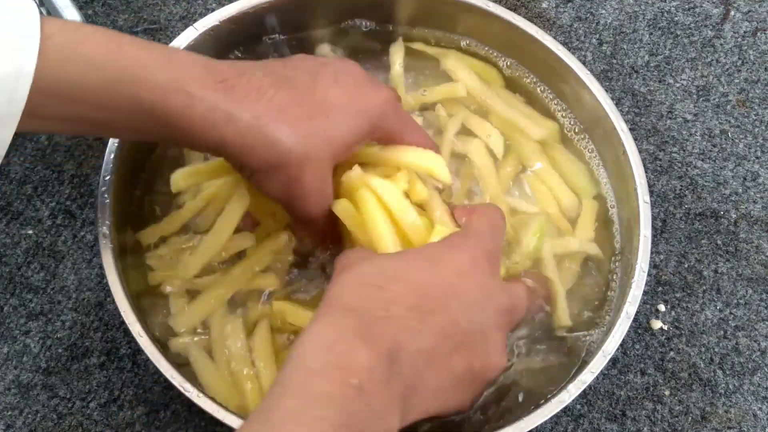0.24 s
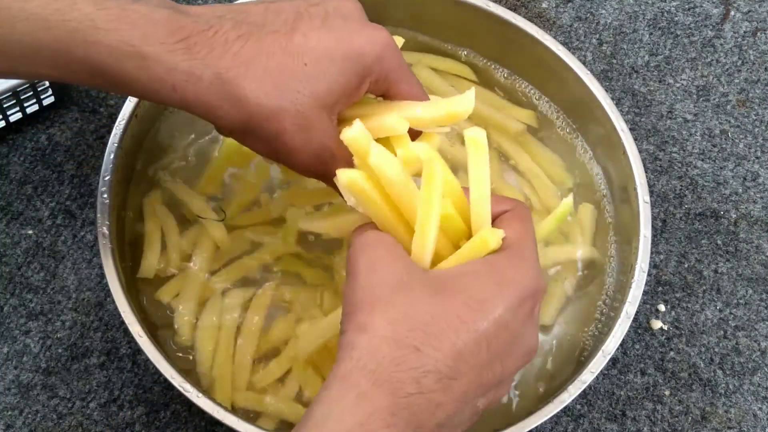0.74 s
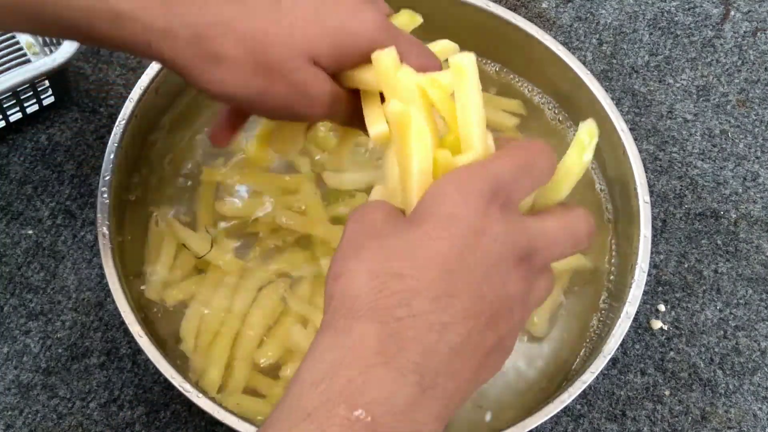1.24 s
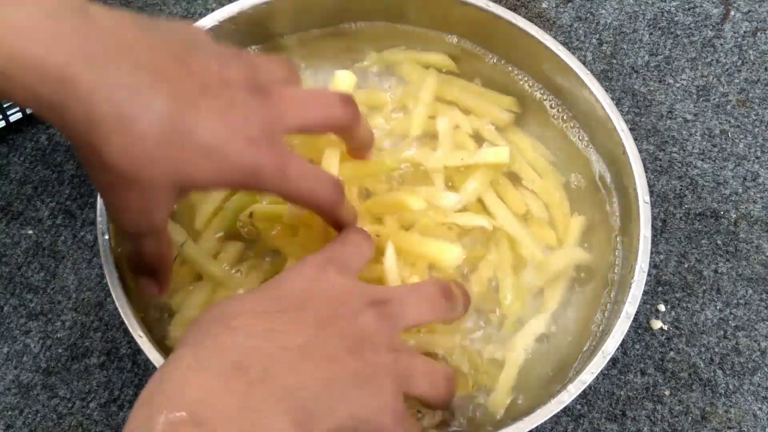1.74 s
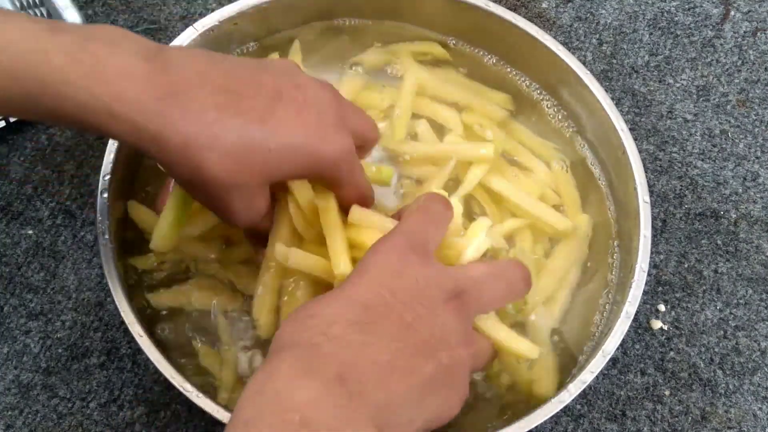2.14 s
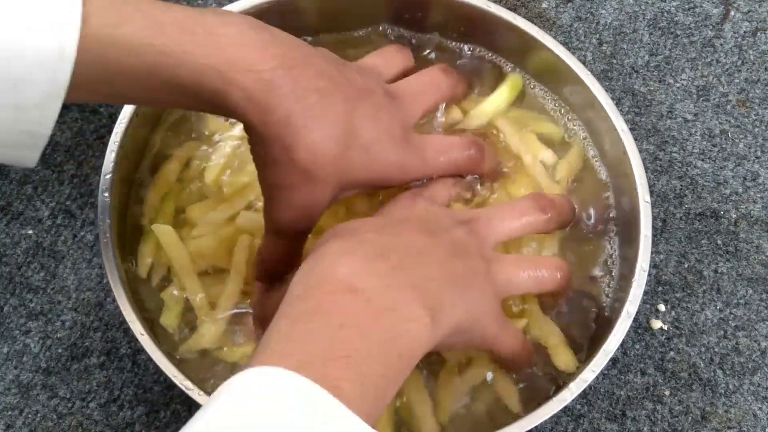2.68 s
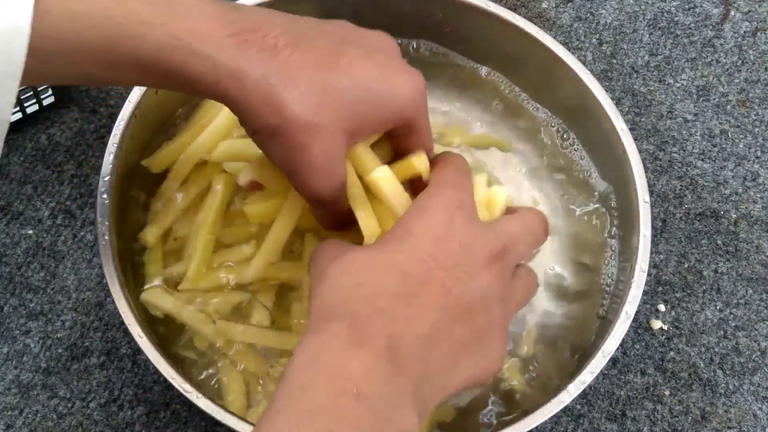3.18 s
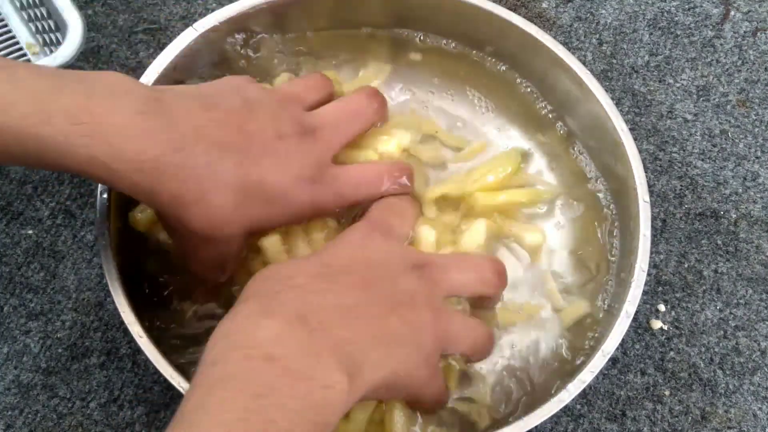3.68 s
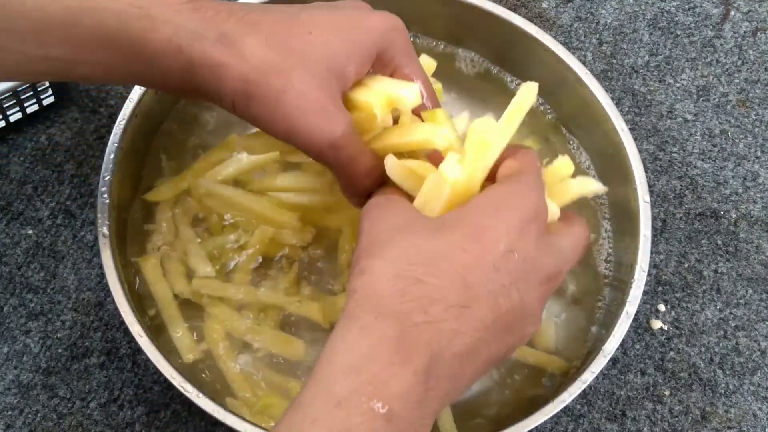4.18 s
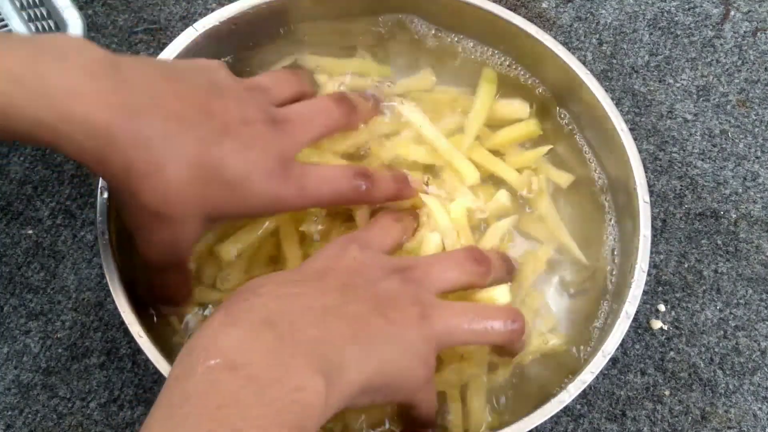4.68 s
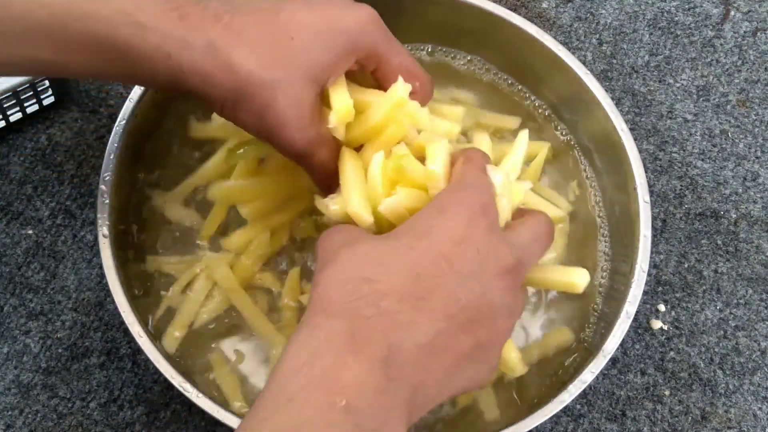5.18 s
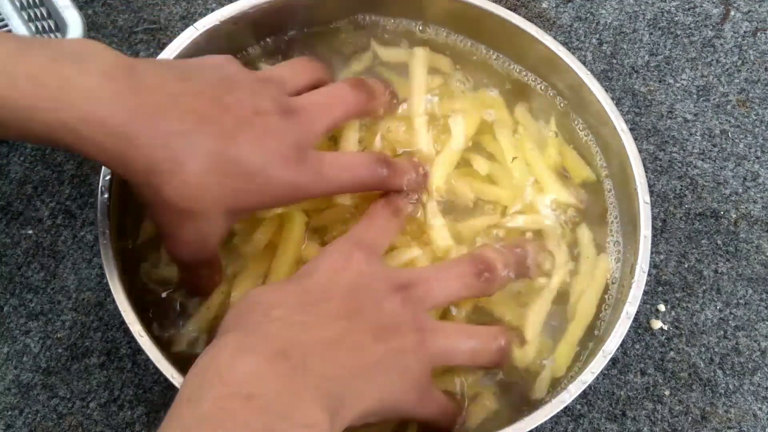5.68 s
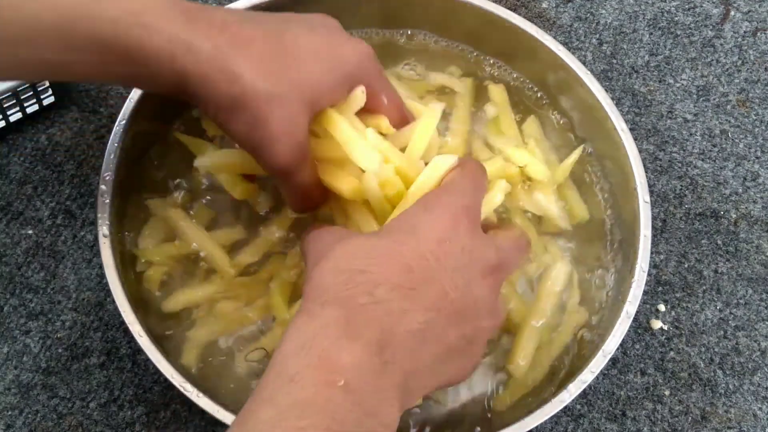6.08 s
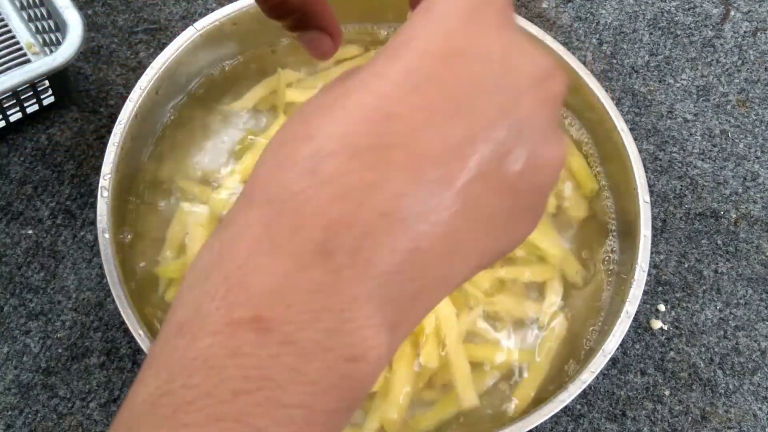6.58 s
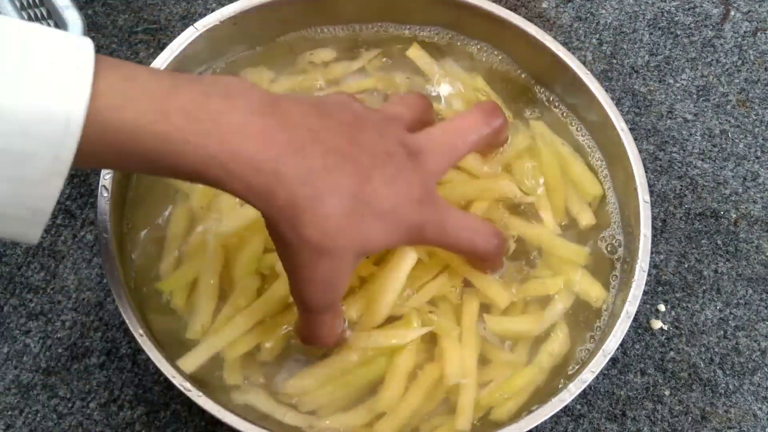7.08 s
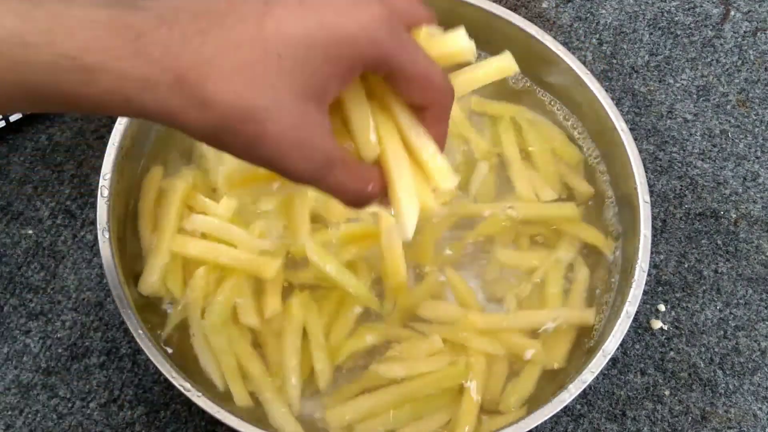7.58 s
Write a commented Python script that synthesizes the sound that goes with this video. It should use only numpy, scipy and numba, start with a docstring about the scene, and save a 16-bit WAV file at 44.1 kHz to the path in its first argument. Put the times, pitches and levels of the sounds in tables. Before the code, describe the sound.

A low, slightly wavering engine drone and soft rumble run beneath close water handling. Wet potato sticks are scooped and released in a bowl: trickling spray at first, then short splashes and small gurgles between quieter gaps where the hiss turns thin and flickering. Fuller splashing returns near the end, with high ticking drops and small plops. The microphone is near the water, with no obvious echo.

```python
"""At a steel bowl of water near an idling engine: two hands scoop and drop potato sticks, heard close up.
Drops tick, larger bubbles plop; both are damped sines that rise in pitch. Dense swarms of such bubbles
make spray, trickle, gurgle and slop. The engine is four multiples of its firing rate over a noise rumble.
Air hiss and narrow noise streaks lie underneath; when the spray is faint, water, rumble and air thin
into flickering narrow bands."""
import sys
import numpy as np
from scipy import signal
from scipy.fft import rfft, irfft
from scipy.io import wavfile
from scipy.ndimage import uniform_filter1d
from numba import njit

SR = 44100
rng = np.random.default_rng(int(sys.argv[2]) if len(sys.argv) > 2 else 0)


def int16_out(signal):
    """Quantize to a 16-bit WAV file."""
    q = np.round(np.clip(np.atleast_2d(signal).T, -1, 1) * 32767)
    wavfile.write(sys.argv[1], SR, q.astype(np.int16))


N = 345303

# engine: (time [s], mean firing rate [Hz], multiple 4 [dB], loudest of multiples 5-7 [-], its level [dB]);
# levels before trim and wavering
ENGINE_CURVE = [(0.0, 23.7, -55, 5.8, -28), (0.3, 24.0, -45, 5.9, -29.5), (1.13, 25.5, -60, 5.1, -28),
                (1.28, 24.63, -31, 7, -46), (1.46, 26.2, -32, 5, -50), (1.74, 25.6, -34, 6, -28.5),
                (2.14, 25.3, -40, 5, -29.5), (2.66, 25.5, -59, 5.1, -32), (2.8, 25.5, -37, 6, -37.5),
                (3.12, 25.9, -32.5, 5, -30), (3.45, 25.4, -31.5, 5.5, -28.5),
                (3.68, 24.61, -39.5, 6, -36.5), (4.0, 25.1, -33.5, 5, -33), (4.56, 25.5, -34, 5, -29),
                (4.7, 26.2, -33, 5, -31.5), (4.88, 23.6, -57, 6, -27), (5.6, 23.7, -33.5, 5.9, -24.5),
                (6.19, 24.05, -34.5, 5.6, -25), (6.32, 24.1, -33.5, 6, -30), (6.87, 24.1, -38, 6, -40),
                (7.3, 24.3, -30, 5.6, -29), (7.63, 24.4, -28.5, 5.2, -28.5), (7.83, 24.7, -49, 5, -30.5)]
# rumble spectrum: (frequency [Hz], relative density [dB per Hz])
RUMBLE_SPECTRUM = [(12, -13), (20, -21), (48, -15), (102, -1), (128, 1), (160, 0.5), (222, -13),
                   (279, -15.5), (420, -26.5), (550, -63), (920, -120)]
# air hiss spectrum: (frequency [Hz], relative density [dB per Hz])
AIR_SPECTRUM = [(300, -12), (500, -1), (900, -4), (1500, -15.5), (3000, -17.5), (9000, -33), (15500, -18)]
# lingering narrow bands of hiss: (start [s], end [s], centre [Hz], width [Hz], level before fades [dB])
STREAK_BANDS = [(0, 1.36, 347, 40, -52.5), (0, 2.3, 256.5, 41, -47), (5, 8.1, 265.7, 47, -47),
                (3, 3.22, 480, 70, -53), (2.29, 2.43, 2390, 88, -56), (3, 3.9, 262, 60, -46),
                (3.91, 4.29, 3050, 70, -54), (3.8, 4.25, 3400, 50, -57), (3.84, 4.27, 2720, 50, -59),
                (3.43, 3.8, 2900, 130, -58), (6.89, 7.08, 850, 45, -42), (5.0, 5.2, 1900, 90, -53),
                (1.26, 1.44, 2620, 110, -48), (2.71, 2.9, 2300, 120, -60), (2.73, 2.8, 4950, 250, -55),
                (0.62, 0.85, 2620, 110, -50), (0.94, 1.08, 2620, 110, -50), (6.92, 7.17, 1870, 130, -46),
                (4, 4.94, 346, 37, -47), (5, 5.22, 870, 47, -50.5), (5.5, 5.8, 866, 47, -56),
                (5, 6.34, 365, 29, -49), (6.5, 6.74, 1900, 120, -49.5), (4.8, 4.92, 3300, 200, -60),
                (4.89, 5.07, 4700, 200, -56), (5.2, 5.62, 1300, 90, -59), (1.63, 1.81, 2400, 100, -55),
                (1.7, 1.84, 1700, 90, -58), (1.87, 2.03, 2750, 100, -58), (2.03, 2.32, 870, 60, -55),
                (4.52, 4.74, 2850, 70, -60), (7, 7.9, 870, 58, -53.5)]
# water draining from hands and sticks: (time [s], spray level before mix [dB])
DRAIN_CURVE = [(0.0, -32), (0.2, -31.5), (0.42, -33.5), (0.64, -35.5), (0.9, -30.5), (1.08, -30.5),
               (1.42, -33), (1.54, -47), (2.1, -61), (2.5, -56.5), (3.15, -81), (3.9, -51.5), (4.6, -53.5),
               (5.0, -54.5), (5.4, -50), (5.68, -55), (6.0, -80), (6.14, -65), (6.24, -43), (6.45, -30),
               (6.66, -38), (6.75, -37.5), (7.2, -34), (7.5, -30), (7.83, -35.5)]
# splashes: (crest [s], rise [s], hold [s], spray [dB], trickle [dB], gurgle [dB], slop [dB]); before mix
SPLASH_EVENTS = [(0.1, 0.31, 0.1, -34.5, -47, -66, -46), (0.31, 0.12, 0.097, -38, -39.5, -53.5, -52),
                 (0.865, 0.34, 0.094, -34, -41.5, -57, -72), (1.188, 0.05, 0.022, -53, -48, -54, -45.5),
                 (1.448, 0.016, 0.015, -35, -50, -56, -69), (1.714, .05, 0.026, -40.5, -75, -77, -77),
                 (1.818, .02, 0.042, -48, -84, -82, -80), (2.221, 0.042, 0.05, -42, -45, -55, -72),
                 (2.302, .03, 0.014, -57, -68, -75, -49), (2.574, 0.021, 0.017, -50.5, -66, -67, -61),
                 (2.664, 0.059, 0.031, -40, -61, -57, -74), (2.86, 0.03, 0.17, -58, -61, -62, -45),
                 (3.05, 0.22, 0.085, -60, -57, -63, -44.5), (3.242, 0.13, 0.12, -41.5, -46.5, -45.5, -41.5),
                 (3.446, 0.06, 0.052, -51, -60, -55, -67), (3.617, 0.14, 0.045, -44, -49.5, -46, -46.5),
                 (3.767, 0.087, 0.06, -66, -74, -75, -40.5), (4.05, 0.013, 0.038, -38, -78, -54, -67),
                 (4.16, 0.033, .03, -48, -65, -73, -47), (4.342, 0.083, 0.03, -33.5, -38.5, -46, -49),
                 (4.625, .02, 0.014, -51, -64, -76, -45), (5.161, 0.094, 0.047, -42, -44.5, -50.5, -52.5),
                 (5.3, 0.077, 0.043, -48.5, -51, -55, -67), (5.444, .05, 0.028, -48, -54, -64, -71),
                 (5.732, .03, 0.0058, -37.5, -53, -76, -66), (5.797, 0.071, 0.031, -70, -39.5, -75, -68),
                 (6.2, 0.17, 0.05, -34.5, -40, -59, -44), (6.326, 0.053, 0.028, -30, -38, -45.5, -45),
                 (6.477, 0.051, 0.1, -56, -52, -48.5, -45), (6.703, 0.053, 0.045, -32, -43.5, -50.5, -49),
                 (6.813, 0.072, 0.038, -31, -66, -61, -47), (6.951, 0.034, 0.16, -34.5, -44.5, -53, -46.5),
                 (7.467, 0.59, 0.21, -56, -56, -44.5, -47.5), (7.608, 0.032, 0.036, -28, -38, -49, -66),
                 (7.703, 0.017, 0.009, -27.5, -31, -51, -53), (7.756, 0.025, 0.007, -25, -32, -35, -43)]
# decay after a splash: (spray, trickle, gurgle, slop) [dB/s]
SPLASH_FALL_DB_PER_S = [96, 133, 140, 108]
# wander of lapping: (trickle, gurgle, slop) [dB]
LAP_WANDER_DB = [2, 3, 2]
# spray weighting: (frequency [Hz], weight [dB])
SPRAY_WEIGHT = [(2060, -38), (3500, -19.5), (4500, -11), (5830, -4.5), (8680, 2.5), (12700, -5.5),
                (14900, -8), (15800, 11)]
# tiny drops carry no low sound: (frequency [Hz], weight [dB])
NO_BASS_WEIGHT = [(2000, -30), (4000, 0)]
# drops that hit the surface: (time [s], nominal peak [dB], starting pitch [Hz])
TICK_EVENTS = [(0.092, -14.5, 8350), (0.397, -19, 7600), (1.0617, -16, 8700), (1.1646, -13.5, 8750),
               (1.2233, -16, 7550), (1.3002, -18, 7280), (1.45, -17, 7450), (1.48, -17.5, 9250),
               (1.523, -27, 5570), (1.7205, -22, 6540), (1.744, -25, 10300), (1.789, -22, 6350),
               (1.877, -32, 8800), (1.927, -35, 5640), (2.1957, -19.5, 7980), (2.2288, -22.5, 6560),
               (2.244, -23, 8000), (2.2825, -23, 6800), (2.6306, -23.5, 10700), (3.271, -29.5, 5800),
               (3.321, -15, 8530), (3.4377, -33, 5800), (3.5886, -31.5, 6860), (3.672, -26, 5800),
               (4.0506, -8.5, 7810), (4.101, -24, 6800), (4.182, -24, 6865), (4.2487, -23.5, 9150),
               (4.2774, -23.5, 5650), (4.306, -22, 9060), (4.324, -16, 8400), (4.3477, -17.5, 9000),
               (4.3903, -16.5, 6560), (4.408, -12, 9600), (5.129, -32, 7200), (5.143, -24.5, 6960),
               (5.1935, -19.5, 9100), (5.226, -23, 8900), (5.2828, -28, 6700), (5.3506, -34, 6840),
               (5.374, -31, 9100), (5.447, -27, 7200), (5.7155, -21, 8600), (5.733, -15, 7740),
               (6.2088, -16.5, 9200), (6.261, -15, 7900), (6.343, -14.5, 9800), (6.4122, -19, 8430),
               (6.464, -26, 8000), (6.4795, -16.5, 7430), (6.489, -18, 8000), (6.5116, -21, 7200),
               (6.5575, -14, 9100), (6.576, -21, 8550), (6.697, -23, 7400), (6.8136, -28, 8840),
               (7.5972, -17, 4440), (7.625, -20, 9000), (7.662, -21, 8000), (7.7052, -10.5, 6840),
               (7.7131, -9, 9150), (7.7199, -12.5, 4270), (7.742, -10, 3680), (7.7443, -10, 6600),
               (7.7476, -7, 9150), (7.7605, -9, 7250), (7.7628, -10, 9000), (7.7655, -9, 7200),
               (7.769, -14, 8700), (7.806, -17, 7300)]
# larger bubbles: (time [s], nominal peak [dB], starting pitch [Hz])
PLOP_EVENTS = [(0.333, -34, 3500), (1.362, -35.5, 1980), (1.428, -45, 1580), (1.453, -34, 3090),
               (1.711, -42, 2430), (1.877, -39, 2850), (2.228, -42, 1825), (2.234, -37, 3100),
               (2.254, -37.5, 1405), (2.266, -38, 2500), (2.308, -39.5, 1005), (2.662, -39, 940),
               (3.153, -44, 1490), (3.621, -40, 1525), (4.073, -36, 1370), (4.248, -38, 2560),
               (4.334, -33, 3100), (4.369, -26.5, 1905), (5.145, -34, 1960), (5.172, -26.5, 2030),
               (5.19, -33, 3920), (5.809, -33, 2210), (6.22, -34, 2790), (6.314, -35.5, 1490),
               (6.697, -37, 2060), (6.933, -29.5, 841), (7.597, -26.5, 2090), (7.704, -30.5, 2680),
               (7.762, -24, 2720), (7.768, -33, 1270)]

RUMBLE_DB, AIR_DB = -32.5, -59.5
STEADY_AIR_UNDER_DB = -8  # air that never breaks up
SEVENTH_FLOOR_DB = -39  # multiple 7, before trim and wavering
OFF_PEAK_DB = -8  # per multiple away from the loudest
TRICKLE_UNDER_DB, GURGLE_UNDER_DB = -8.5, -46  # draining, relative to spray
THIN_DB_PER_DB, FULL_DB = 0.4, -29  # extra trickle loss per dB of spray below full flow
CALM_GURGLE_DB, CALM_SLOP_DB, LAP_HZ = -69.5, -57, 12  # lapping between splashes
SPLASH_RISE_DB = 22  # climb over one rise time
TICK_T60_CYCLES = 39  # main bubble, at starting pitch
PLOP_T60_S, PLOP_T60_POWER = 0.046, -.7  # at 2 kHz; smaller bubbles die sooner
TOP_HZ = 15600
STFT = dict(nperseg=512, noverlap=384)


def undb(db):
    """dB to amplitude."""
    return 10 ** (np.asarray(db) / 20)


def level(x, db):
    """Scales to an rms in dB."""
    return x * undb(db) / np.sqrt(np.mean(x ** 2))


def noise():
    """White noise of full length."""
    return rng.standard_normal(N)


def columns(table):
    """Every column of a time curve, one value a sample."""
    time_s, *rest = np.transpose(table)
    return [np.interp(np.arange(N) / SR, time_s, c) for c in rest]


def colour(x, spectrum):
    """Weights a sound by (Hz, dB) points, linear in dB over log frequency."""
    hz, db = np.transpose(spectrum)
    f = np.maximum(np.arange(N // 2 + 1) * SR / N, 1)
    return irfft(rfft(x) * undb(np.interp(np.log(f), np.log(hz), db)), N)


def walk(rate_hz):
    """Random levels held 1 / rate_hz and slewed twice; spread near 1."""
    k = max(int(SR / rate_hz), 2)
    held = np.repeat(rng.standard_normal(N // k + 1), k)
    return 1.263 * uniform_filter1d(uniform_filter1d(held, k), k)[:N]


@njit
def ring(n, sr, start_s, size, hz, t60_s, glide):
    """Each bubble is a damped sine whose pitch rises by the share glide while it dies."""
    out = np.zeros(n)
    for e in range(len(start_s)):
        start, steps, phase = int(start_s[e] * sr), int(t60_s[e] * sr) + 2, 0.
        fall, a = 1000. ** (-1. / steps), size[e]
        for i in range(min(steps, n - start)):
            phase += 2 * np.pi * min(hz[e] * (1 + glide * i / steps) / sr, .45)
            out[start + i] += a * np.sin(phase) * min(phase / (3 * np.pi), 1.)  # swells over 1.5 cycles
            a *= fall
    return out


def swarm(count, lo_hz, hi_hz, cycles, spread_db, glide, hiss_db):
    """Bubbles at random moments, a few far louder than the rest, over a band of hiss; rms 1."""
    u_time, u_pitch, u_size = rng.random((count, 3)).T
    hz = lo_hz * (hi_hz / lo_hz) ** u_pitch
    size = undb(np.minimum(-spread_db * np.log(1 - u_size), 16.))
    grains = ring(N, 1. * SR, u_time * N / SR, size, hz, cycles / hz, glide)
    band = [(lo_hz * 0.4, -35), (lo_hz, 0), (hi_hz, -3), (hi_hz * 1.15, -35)]
    return level(level(grains, 0) + level(colour(noise(), band), hiss_db), 0)


def engine():
    """Multiples 4-7 of an uneven firing rate, each wavering in level at random."""
    hz, low_db, loudest, db = columns(ENGINE_CURVE)
    turn = 2 * np.pi * np.cumsum(hz * (1 + 0.0086 * walk(6))) / SR
    line_db = [low_db] + [db + OFF_PEAK_DB * np.abs(k - loudest) for k in range(5, 8)]
    line_db[3] = np.maximum(line_db[3], SEVENTH_FLOOR_DB)
    out = np.zeros(N)
    for k, db in enumerate(line_db, 4):
        size = undb(db - 1 + 3.13 * walk(9))
        out += np.sqrt(2) * size * np.sin(k * turn + 2 * np.pi * rng.random())
    return out


def rumble():
    """Broad low noise under the engine, its level wandering."""
    return undb(1.03 * walk(6)) * level(colour(noise(), RUMBLE_SPECTRUM), RUMBLE_DB)


def air(db):
    """Steady room hiss: coloured noise."""
    return level(colour(noise(), AIR_SPECTRUM), db)


def streaks():
    """Narrow bands of hiss that come and go: noise through resonators."""
    out, t = np.zeros(N), np.arange(N) / SR
    for start_s, end_s, hz, width_hz, db in STREAK_BANDS:
        b, a = signal.iirpeak(hz, hz / (2 * width_hz), SR)
        band = noise()
        for _ in range(3):  # steep flanks
            band = signal.lfilter(b, a, band)
        fade = np.clip(np.minimum((t - start_s) / 0.029, (end_s - t) / 0.1), 0, 1)
        out += level(band * undb(2.55 * walk(18)), db) * fade
    return out


def stir():
    """Levels [dB] of the four bubble sizes: draining and lapping, each splash added in power."""
    t, (drain_db,) = np.arange(N) / SR, columns(DRAIN_CURVE)
    lap_db = [db * walk(LAP_HZ) for db in LAP_WANDER_DB]
    trickle_db = drain_db + TRICKLE_UNDER_DB + THIN_DB_PER_DB * (drain_db - FULL_DB) + lap_db[0]
    gurgle_db = np.maximum(drain_db + GURGLE_UNDER_DB, CALM_GURGLE_DB) + lap_db[1]
    power = undb([drain_db, trickle_db, gurgle_db, CALM_SLOP_DB + lap_db[2]]) ** 2
    for crest_s, rise_s, hold_s, *db in SPLASH_EVENTS:
        near = slice(*np.searchsorted(t, [crest_s - 3 * rise_s, crest_s + hold_s + .5]))
        early_s = np.maximum(crest_s - t[near], 0)
        late_s = np.maximum(t[near] - crest_s - hold_s, 0)
        climb_db = SPLASH_RISE_DB * early_s / max(rise_s, .005)
        power[:, near] += undb(np.c_[db] - climb_db - np.c_[SPLASH_FALL_DB_PER_S] * late_s) ** 2
    return 10 * np.log10(power)


def wash(spray_db, trickle_db, gurgle_db, slop_db):
    """Four sizes of bubbles follow the stirring; smaller bubbles ring higher."""
    spray = swarm(count=20000, lo_hz=3650.0, hi_hz=14900.0, cycles=18.0, spread_db=4.0, glide=0.072, hiss_db=2.0)
    trickle = swarm(count=4000, lo_hz=2240.0, hi_hz=4950.0, cycles=31.0, spread_db=2.0, glide=0.41, hiss_db=2.5)
    gurgle = swarm(count=900, lo_hz=1061.0, hi_hz=1934.0, cycles=95.0, spread_db=3.0, glide=0.22, hiss_db=0.0)
    slop = swarm(count=1200, lo_hz=449.0, hi_hz=881.0, cycles=9.9, spread_db=3.0, glide=0.19, hiss_db=6.5)
    # lone droplets
    pricks = swarm(count=1200, lo_hz=5270.0, hi_hz=14700.0, cycles=6.9, spread_db=5.0, glide=0.05, hiss_db=-25.0)
    spray = level(colour(spray, SPRAY_WEIGHT), 0) + level(colour(pricks, NO_BASS_WEIGHT), -15.5)
    patter = undb(1.1 * walk(60) + 0.5 * walk(18))  # drops fall in clusters
    fine = undb(spray_db) * level(spray, -2.17) + undb(trickle_db) * level(trickle, -3.5)
    coarse = undb(gurgle_db) * level(gurgle, -1.2) + undb(slop_db) * level(slop, -0.12)
    return patter * fine + coarse


def break_up(x, spray_db):
    """When the spray is faint the sound thins into flickering narrow bands; strong spray keeps the treble whole."""
    knee_db, depth_db, share, last_s = -46, -15, .33, .065
    f, t, z = signal.stft(x, SR, **STFT)
    chance, k = rng.standard_normal(z.shape), int(last_s / t[1])
    chance = uniform_filter1d(uniform_filter1d(chance, k, axis=1), k, axis=1)
    chance = uniform_filter1d(chance, size=2, axis=0)
    chance = chance / chance.std(axis=1, keepdims=True)
    chance = chance - np.quantile(chance, 1 - share)
    patch = undb(depth_db / (1 + np.exp(5 * chance)))
    faint = 1 / (0.5 + np.exp((np.interp(t, np.arange(N) / SR, spray_db) - knee_db) / 3))
    always = np.interp(f, [1900, 2600, 5200], [.9, .45, 0])[:, None]  # least break-up
    faint = np.maximum(faint, always) * np.interp(f, [190, 400], [0, 1])[:, None]  # lows stay whole
    blots = rng.standard_normal(z.shape)
    blots = uniform_filter1d(uniform_filter1d(blots, size=14, axis=0), size=9, axis=1)
    z = z * undb(1.63 * blots / blots.std() * (f > 900)[:, None])  # colour shifts from moment to moment
    grid = np.linspace(0, 1, 9)
    loss = np.interp(faint, grid, [np.mean(patch ** (2 * a)) for a in grid])  # keeps the level up to faint = 1
    return signal.istft(z * patch ** faint / np.sqrt(loss), SR, **STFT)[1][:N]


def burst(events, t60_s, count, spread, side_db, glide):
    """Each drop frees one main bubble and a few weaker ones of nearby sizes just after it."""
    start_s, db, hz = np.transpose(events)
    t60_s = np.clip(t60_s, .001, .2)
    out = ring(N, 1. * SR, start_s, undb(db), hz, t60_s, glide)
    u = rng.random((len(start_s), count, 2))
    for k in range(count):
        side_s = start_s + .15 * t60_s * u[:, k, 0]
        side_hz = hz * spread ** (2 * u[:, k, 1] - .7)
        out = out + ring(N, 1. * SR, side_s, undb(db + side_db), side_hz, 1.74 * t60_s, glide)
    return out


def ticks():
    """Single drops: short high bubble rings with a faint noise crack across the treble."""
    start_s, db, hz = np.transpose(TICK_EVENTS)
    crack = np.zeros(N)
    crack[(start_s * SR).astype(int)] = undb(db - 3.0)
    crack = signal.lfilter([1], [1, -np.exp(-1 / (0.002 * SR))], crack) * noise()  # 2 ms decay
    crack = colour(crack, [(3000, -34), (5500, -0.5), (9000, 0.5), (15000, -7.0)])
    rings = burst(TICK_EVENTS, TICK_T60_CYCLES / hz, count=4, spread=1.34, side_db=-12.5, glide=0.22)
    return crack + colour(rings, NO_BASS_WEIGHT)


def plops():
    """Larger bubbles: lower rings, longer the lower the pitch."""
    hz = np.transpose(PLOP_EVENTS)[2]
    t60_s = PLOP_T60_S * (hz / 2000) ** PLOP_T60_POWER
    return burst(PLOP_EVENTS, t60_s, count=3, spread=1.4, side_db=-13.0, glide=0.072)


def scene():
    """Water, rumble and air break up together; engine lines, streaks, drops and steady air stay whole."""
    stir_db = stir()
    broken = break_up(wash(*stir_db) + rumble() + air(AIR_DB), stir_db[0])
    whole = engine() + streaks() + ticks() + plops() + air(AIR_DB + STEADY_AIR_UNDER_DB)
    return (whole + broken)[None]


def record(dry):
    """A steep low-pass cuts the top."""
    return signal.sosfilt(signal.ellip(12, .2, 100, TOP_HZ, fs=SR, output="sos"), dry)


dry = scene()
out = record(dry)
int16_out(out)
```